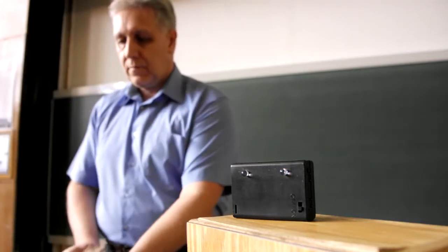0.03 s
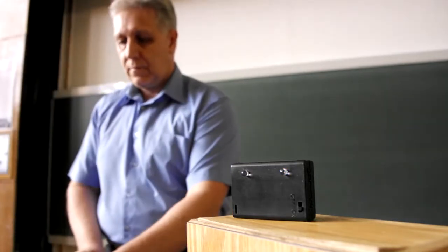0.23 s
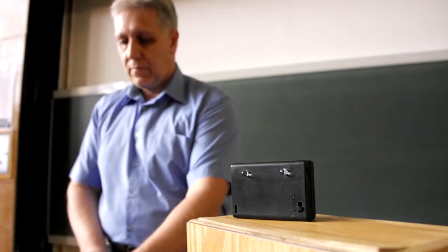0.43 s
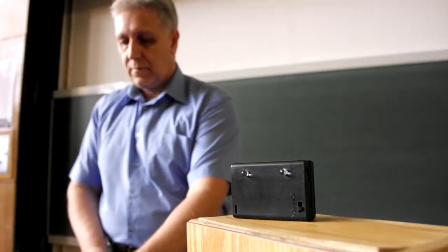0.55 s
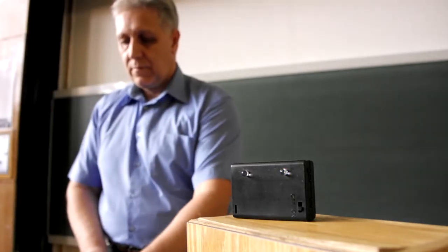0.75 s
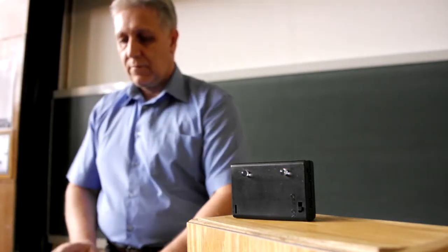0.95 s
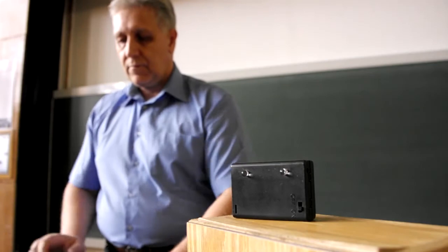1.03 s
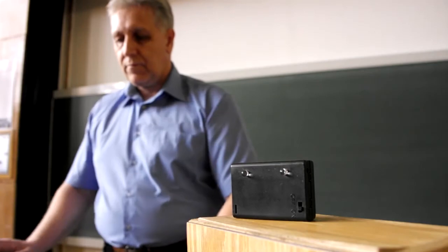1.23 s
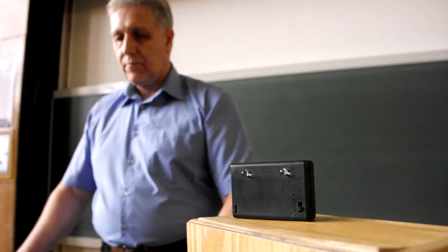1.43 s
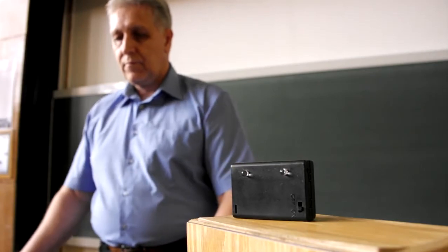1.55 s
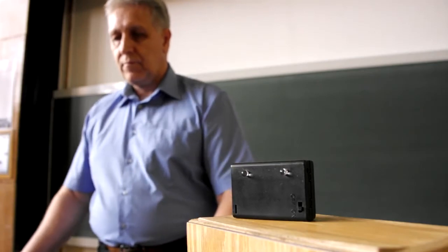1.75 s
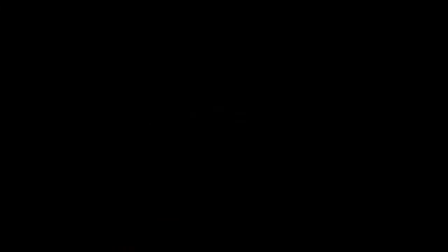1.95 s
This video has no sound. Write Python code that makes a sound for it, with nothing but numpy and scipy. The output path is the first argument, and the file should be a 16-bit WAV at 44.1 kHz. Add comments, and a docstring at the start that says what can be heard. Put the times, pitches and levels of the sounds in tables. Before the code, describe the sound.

A sharp double snap cracks slightly left of the microphone and echoes through a lecture room with a long hissy tail. Half a second later something lands on a wooden desk with a hollow thump, over faint room hiss.

```python
"""Faint room hiss, then a sharp double snap in a lecture room, slightly left of a stereo pair.
The snapping part clatters and rings; the walls throw the crack back and a long hissy tail fills the room.
Half a second later something lands on a wooden desk and bounces once, ringing it with a hollow thump.
Room hiss and low rumble swell after the snap and slowly sink; two faint low drones come and go."""
import sys
import numpy as np
from scipy import signal
from scipy.fft import rfft, irfft
from scipy.io import wavfile

SR = 44100
rng = np.random.default_rng(int(sys.argv[2]) if len(sys.argv) > 2 else 0)


def master(y):
    """Save y as 16-bit WAV."""
    cut = np.clip(np.atleast_2d(y).T, -1, 1)
    pcm = np.round(cut * 32767)  # scale
    wavfile.write(sys.argv[1], SR, pcm.astype(np.int16))


N = 88200
T = np.arange(N) / SR

# spectrum of the room's answer to the snap: frequency_hz, relative_db
SNAP_ROOM_COLOUR = [(100, -42), (400, -1), (800, -6.5), (1220, -2), (1620, -12.5), (2150, 3.5), (3100, -2),
                    (3900, 2), (4650, -4), (6300, 2.5), (8000, -1.5), (10000, -6), (15000, -21)]


def amp(db):
    """Decibels to gain."""
    return 10 ** (np.asarray(db) / 20)


def read(points, hz):
    """Reads a table on a log-frequency axis."""
    table_hz, value = np.transpose(points)
    return np.interp(np.log(hz + 1), np.log(table_hz + 1), value)


def unit_rms(x):
    """Scales to rms 1."""
    return x / np.sqrt(np.mean(x ** 2) + 1e-20)


def fade(t60_s, t=T):
    """Exponential decay, 60 dB down after t60_s."""
    return np.exp(-np.log(1000) * t / t60_s)


def delay(x, delay_s):
    """Delays a sound by any fraction of a sample."""
    hz = np.fft.rfftfreq(2 * N, 1 / SR)
    return irfft(rfft(x, 2 * N) * np.exp(-2j * np.pi * hz * delay_s))[..., :N]


def noise(colour):
    """Diffuse noise of rms 1; the two microphones hear nearly the same bass but different treble."""
    # likeness of left and right: frequency_hz, correlation
    coherence = [(60, 0.83), (300, 0.84), (700, 0.65), (1400, 0.39), (3000, -0.13), (6800, -0.14),
                 (15000, -0.22)]
    hz = np.fft.rfftfreq(N, 1 / SR)
    likeness = read(coherence, hz)
    mid, side = rfft(rng.standard_normal((2, N)))
    mid, side = mid * np.sqrt(1 + likeness), side * np.sqrt(1 - likeness)
    spectrum = np.array([mid + side, mid - side]) * amp(read(colour, hz))
    return unit_rms(irfft(spectrum, N))


def pulse(colour):
    """A minimum-phase click of unit energy."""
    hz = abs(np.fft.fftfreq(N, 1 / SR))
    log_gain = np.log(amp(read(colour, hz)))
    spectrum = np.exp(np.conj(signal.hilbert(log_gain)))
    return unit_rms(np.fft.ifft(spectrum).real) / np.sqrt(N)


def burst(colour, t60_s):
    """A dying puff of noise of unit energy."""
    return unit_rms(noise(colour) * fade(t60_s)) / np.sqrt(N)


def ring(modes):
    """Dying sines of a struck body."""
    return sum(amp(db) * fade(t60_s) * np.sin(2 * np.pi * hz * T) for hz, db, t60_s in modes)


def room_decay(x):
    """Lets each band die away at the room's own speed."""
    # reverberation time: frequency_hz, t60_s
    decay_times = [(100, 0.73), (500, 1.18), (1200, 3.1), (2500, 1.96), (4500, 1.9), (7000, 1.19),
                   (10000, 1), (15000, 1.74)]
    hz, t, bands = signal.stft(x, SR, nperseg=512)
    return signal.istft(bands * fade(read(decay_times, hz)[:, None], t), SR)[1][:, :N]


def reverb(x):
    """Spreads a mono sound through the room's diffuse stereo response."""
    white = noise([(1, 0), (2, 0)])
    response = unit_rms(room_decay(white)) / np.sqrt(N)
    return signal.fftconvolve(x[None], response, axes=1)[:, :N]


def room_tone():
    """Hiss, dull low noise and rumble all around the microphones, swelling and sinking."""
    # spectra of the three layers: frequency_hz, relative_db
    hiss = [(100, 24), (250, 13), (400, 15.5), (550, 11), (1100, 9.5), (1600, -3.5), (2500, 3), (4000, -1),
            (9000, -2), (15000, -5.5)]
    low_noise = [(30, -18), (70, -1.5), (130, -3), (230, -5), (350, -19), (800, -35)]
    rumble = [(10, -3), (22, 8.5), (38, 4), (60, 0), (100, -16), (200, -47.5)]
    # their swells: time_s, level_db
    hiss_swell = [(0, -61.5), (.21, -66.5), (.3, -65.5), (.6, -54), (.9, -52.5), (1.4, -57), (2, -60)]
    low_swell = [(0, -66), (.25, -63.5), (.42, -57.5), (0.521, -52.5), (.9, -52.5), (1.25, -54.5),
                 (1.55, -54), (1.75, -57.5), (2, -61.5)]
    rumble_swell = [(0, -62), (.22, -59), (.38, -47), (.56, -47), (.7, -43.5), (.92, -47.5), (1.03, -43),
                    (1.22, -43), (1.33, -55), (1.7, -50), (2, -57)]
    layers = [(hiss, hiss_swell), (low_noise, low_swell), (rumble, rumble_swell)]
    return sum(noise(colour) * amp(np.interp(T, *np.transpose(swell))) for colour, swell in layers)


def snap(left_lead_s=.00008, left_bias_db=1.3, tail_build_s=.085):
    """A part cracks and rebounds, clattering and ringing each time, and the room answers."""
    # spectrum of the crack: frequency_hz, relative_db
    crack_colour = [(100, -11), (700, -10), (1250, -2), (1650, -9), (2400, 0), (4500, -2), (7500, 0),
                    (9500, -8), (12500, -12), (15000, -23)]
    # modes of the snapping part: pitch_hz, relative_db, t60_s
    part_modes = [(1195, -1, .13), (1384, -4, .13), (2139, -8, .09), (2560, -4, .07), (3935, -2, .09),
                  (6080, -8, .08), (7150, -8, .08), (11100, -8, .13)]
    # the snap and its quick rebound: start_s, gain_db
    cracks = [(.2332, 0), (.24815, -5.5)]
    click = -pulse(crack_colour)
    click = click + amp(-6) * delay(click, .0008)  # first bounce off a nearby surface
    clatter = amp(4.5) * burst(crack_colour, t60_s=.032)
    direct = np.array([click, delay(click, left_lead_s)]) + clatter
    direct *= amp(-13.5) * amp([[left_bias_db], [-left_bias_db]])
    walls = wall_echoes()
    ringing = amp(-46) * ring(part_modes)
    scatter = amp(-43) * noise(crack_colour) * fade(t60_s=.27)
    tail = amp(-39) * room_decay(noise(SNAP_ROOM_COLOUR)) * (1 - np.exp(-T / tail_build_s))
    crack = direct + walls + ringing + amp(-5.5) * reverb(ringing) + scatter + tail
    return sum(amp(db) * delay(crack, start_s) for start_s, db in cracks)


def wall_echoes():
    """The walls return the crack as three smeared puffs, the farthest the faintest."""
    # reflections: delay_s, level_db, left_minus_right_db
    echoes = [(.036, -18.5, 3), (0.0586, -19, 2.5), (0.1255, -23.5, 0.5)]
    return sum(delay(burst(SNAP_ROOM_COLOUR, t60_s=.039), delay_s) * amp([[db + pan / 2], [db - pan / 2]])
               for delay_s, db, pan in echoes)


def drones():
    """Two faint low tones, one after the other, swell and waver in pitch."""
    # one track for each tone: time_s, pitch_hz, level_db
    tracks = [
        [(.26, 240, -70), (.35, 235.9, -62), (.44, 238.4, -63), (.56, 238.7, -51.5), (.64, 237.7, -54),
         (.72, 245, -51)],
        [(1.25, 63.8, -61), (1.35, 68.25, -44), (1.43, 71.8, -49), (1.53, 68.3, -40), (1.66, 73.4, -54),
         (1.82, 62.5, -53.5), (1.9, 55.6, -50.5)],
    ]
    tones = np.zeros(N)
    for track in tracks:
        time_s, hz, db = np.transpose(track)
        level = amp(np.interp(T, time_s, db)) * (T > time_s[0]) * (T < time_s[-1])
        phase = 2 * np.pi * np.cumsum(np.interp(T, time_s, hz)) / SR
        tones += level * np.sin(phase)
    return tones


def desk_thump(left_lead_s=.00008, rise_s=.002):
    """A soft blow and its bounce ring the hollow desk and the room."""
    # modes of the desk: pitch_hz, relative_db, t60_s
    desk_modes = [(100, -9, .14), (200, -10, .22), (275, -7, .3), (328, -5, .16), (513, 0, .17),
                  (552, -8, .25), (590, -3, .09), (772, -7, .13), (931, -12, .12), (1052, -15, .14),
                  (1380, -23, .14)]
    # spectra of the dull contact knock and the room's answering boom: frequency_hz, relative_db
    knock_colour = [(40, -28), (100, 1), (280, 7.5), (420, -22), (570, -19), (700, -13), (1050, -14),
                    (1500, -26), (2500, -12.5), (6000, -58)]
    boom_colour = [(50, -4), (120, -1.5), (190, 1.5), (240, -11), (280, -1.5), (430, -13), (510, -4.5),
                   (575, 5), (690, -14), (800, -11.5), (1080, -14.5), (1550, -32), (4000, -45)]
    # the landing and its bounce: start_s, gain_db
    blows = [(0.7155, 3.5), (.748, -16.5)]
    body = amp(-27.5) * ring(desk_modes) + amp(-8.5) * pulse(knock_colour)
    direct = np.array([body, delay(body, left_lead_s)])
    boom = amp(-42) * noise(boom_colour) * fade(t60_s=1.6)
    blow = (direct + boom + amp(-14) * reverb(body)) * (1 - np.exp(-T / rise_s))
    return sum(amp(db) * delay(blow, start_s) for start_s, db in blows)


def scene():
    """Everything that reaches the stereo pair."""
    return snap() + desk_thump() + room_tone() + drones()


def record(dry):
    """The recorder cuts the treble above 15.2 kHz."""
    lowpass = signal.firwin(255, 15200, window=("kaiser", 9), fs=SR)
    return signal.oaconvolve(dry, lowpass[None], "same")


dry = scene()
out = record(dry)
master(out)
```